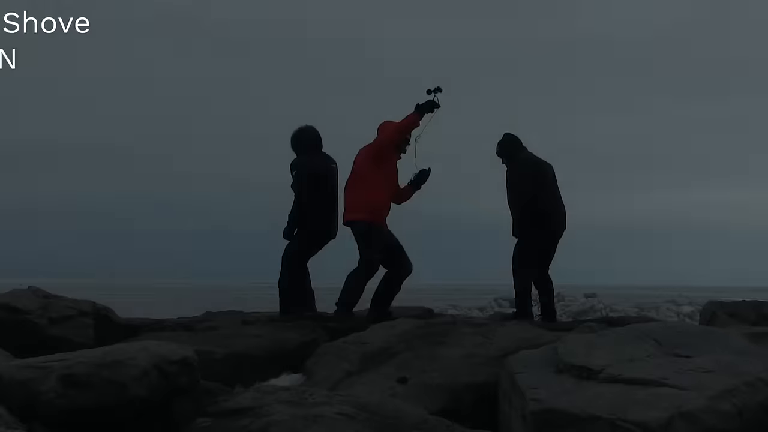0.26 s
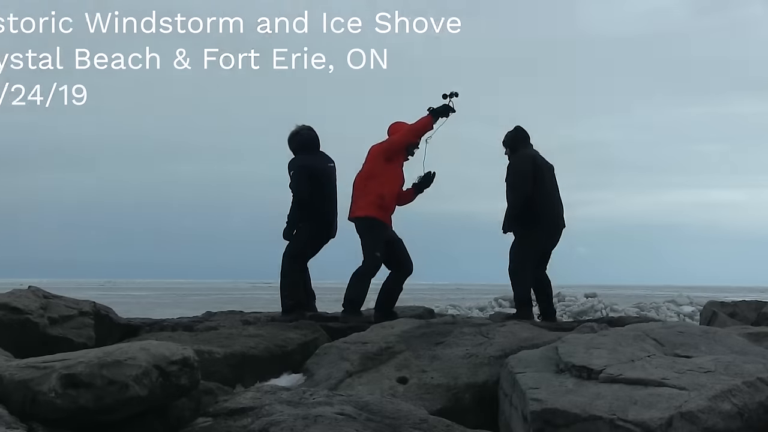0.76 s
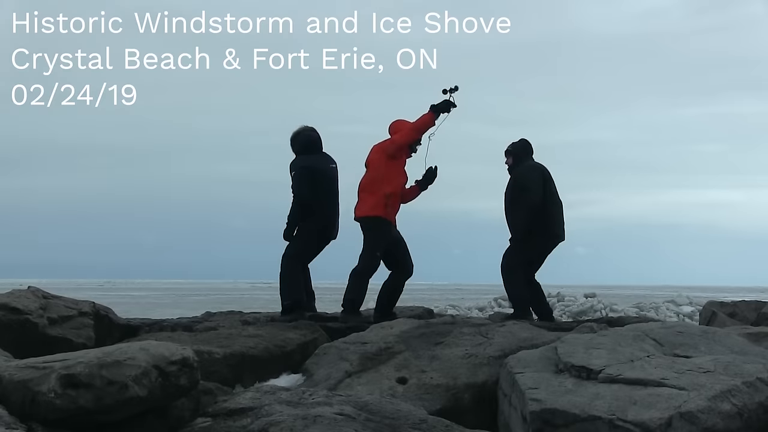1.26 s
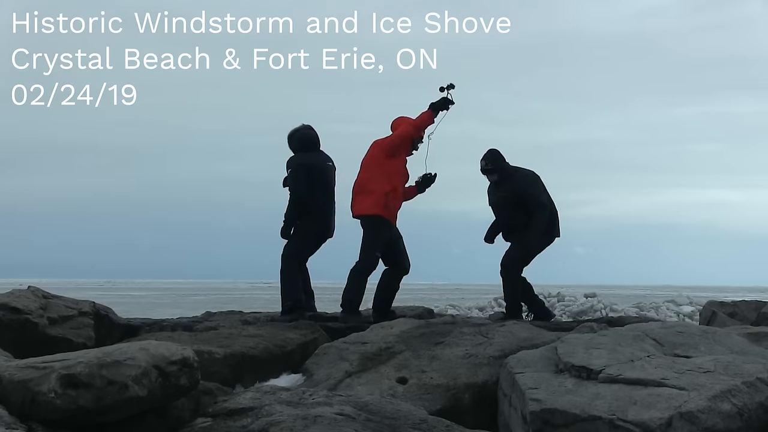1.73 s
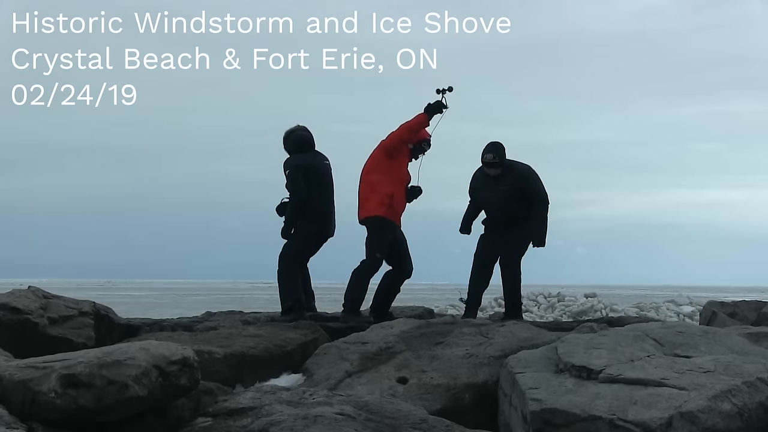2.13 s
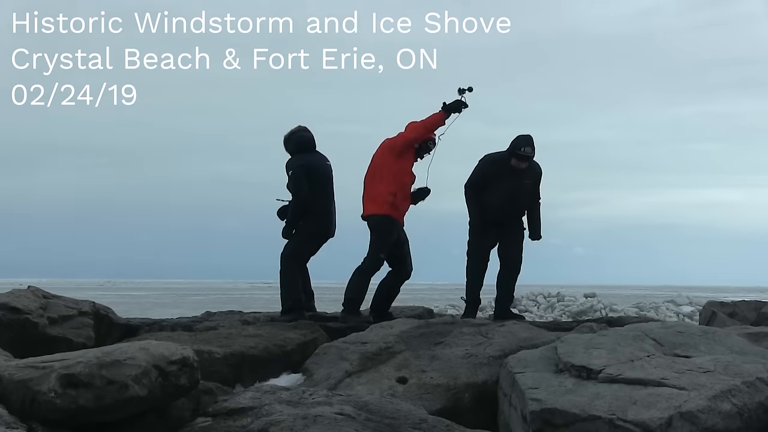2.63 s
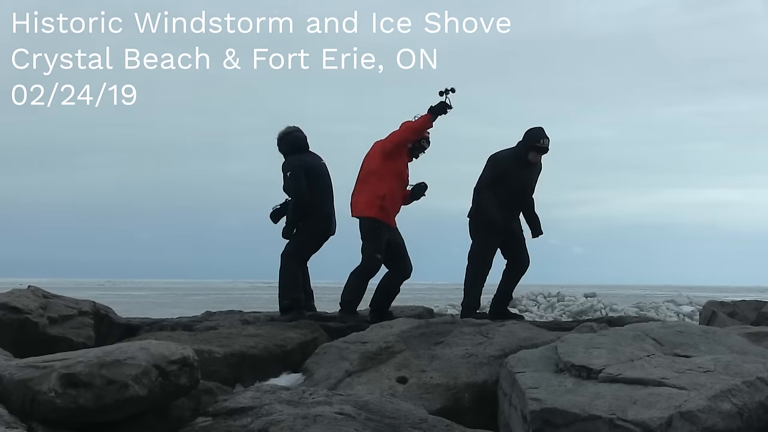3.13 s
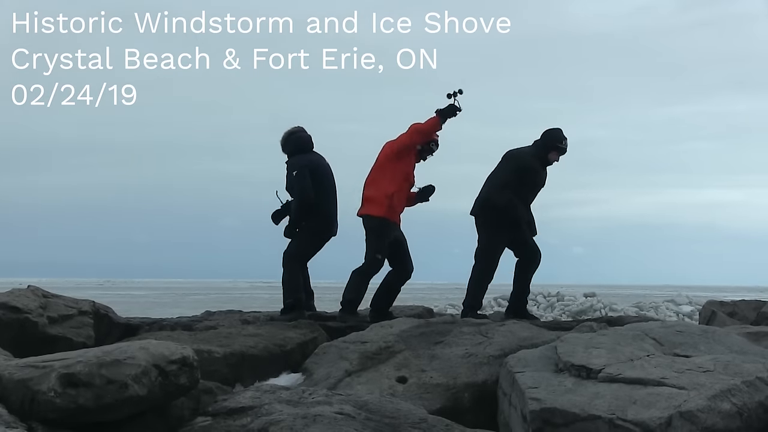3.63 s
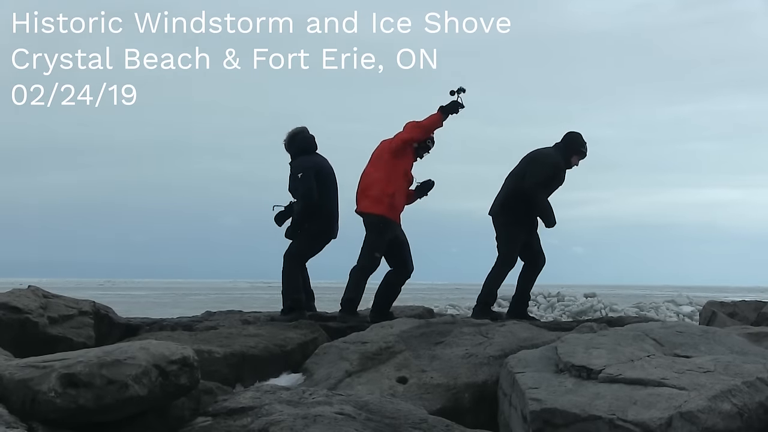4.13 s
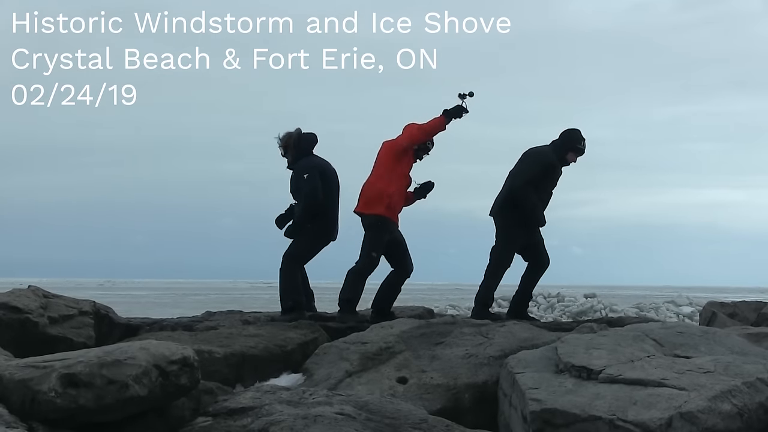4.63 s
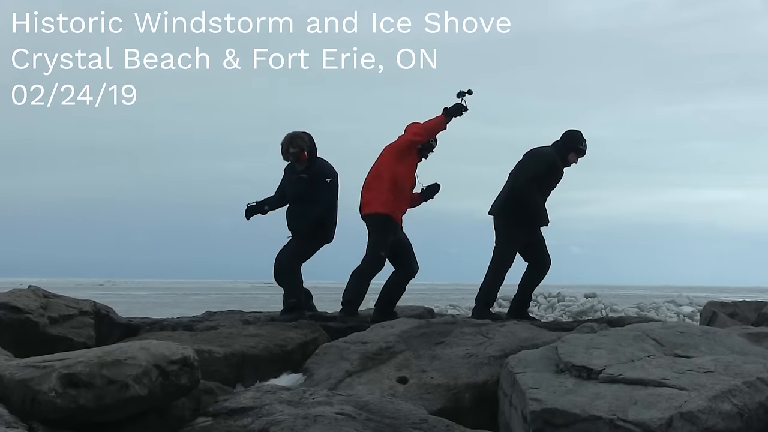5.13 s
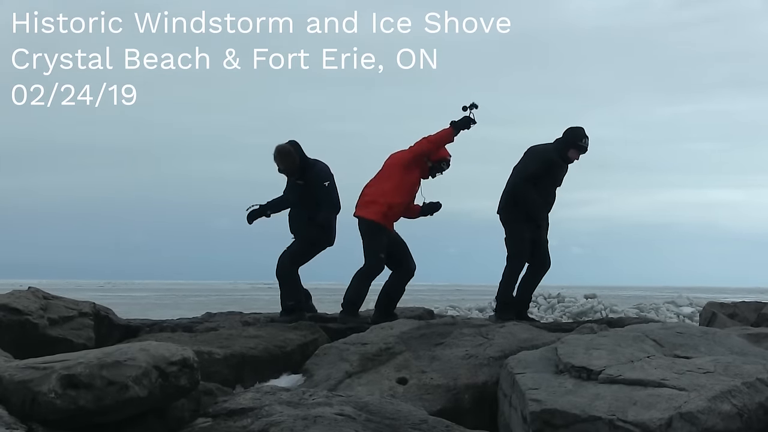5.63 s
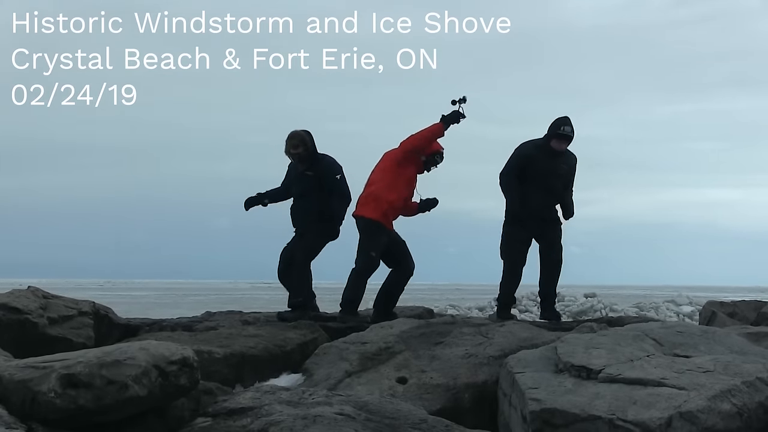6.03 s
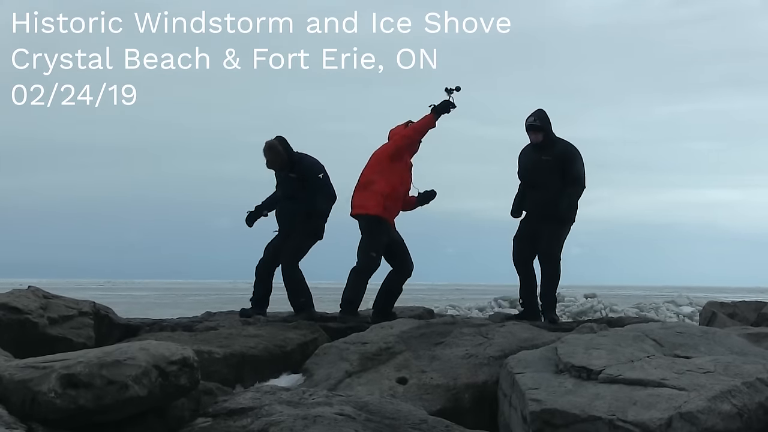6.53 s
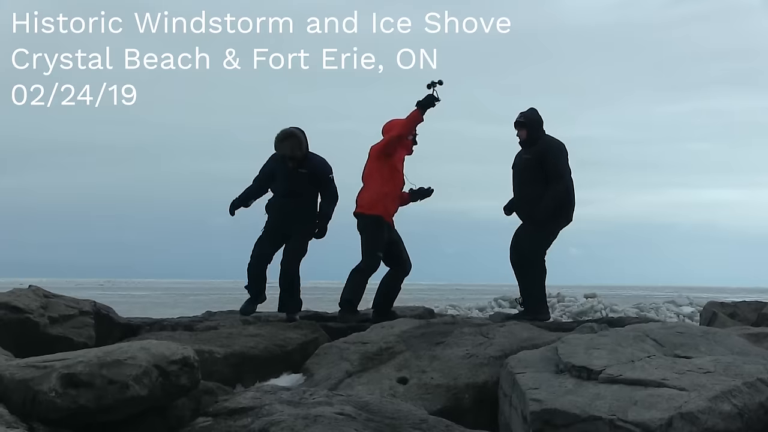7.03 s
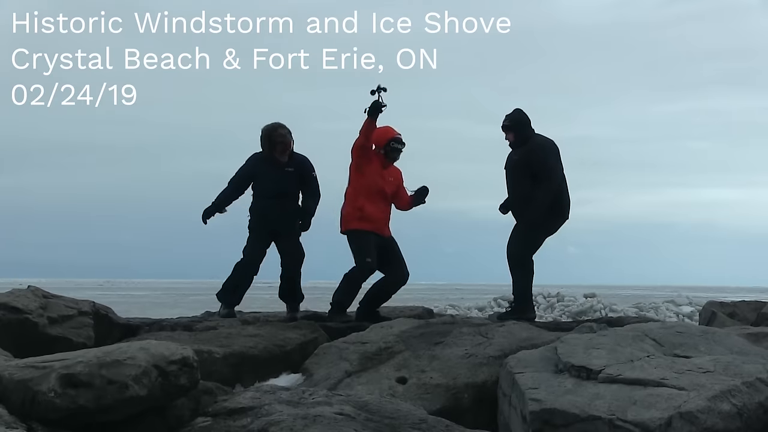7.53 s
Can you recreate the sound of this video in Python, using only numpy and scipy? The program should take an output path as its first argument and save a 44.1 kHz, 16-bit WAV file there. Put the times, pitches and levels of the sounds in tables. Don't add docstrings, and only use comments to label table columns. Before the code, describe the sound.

A continuous low roar of storm wind, very close because it presses directly on the microphone. Gusts swell and dip irregularly, with rumbling bass, a hollow wavering howl that comes and goes, and faint far hiss above. Small crackling spatters and dull knocks interrupt it, the hardest thump in the later part, with the peaks slightly distorted. It continues to the end without resolving.

```python
import sys
import numpy as np
from scipy import signal
from scipy.fft import rfft, irfft, next_fast_len
from scipy.io import wavfile
from scipy.ndimage import uniform_filter1d

SR = 44100
rng = np.random.default_rng(int(sys.argv[2]) if len(sys.argv) > 2 else 0)


def convert_level_to_amplitude(level_db):
    exponent = np.asarray(level_db, float) / 20
    return 10 ** exponent


def unload_audio(sound):
    columns = np.transpose(np.atleast_2d(sound))
    steps = np.round(np.clip(columns, -1, 1) * 32767)
    wavfile.write(sys.argv[1], SR, steps.astype(np.int16))


N = 342657

# start_s, level_db
WIND = [(0.0, -34.5), (0.32, -21.5), (2.44, -19), (2.51, -21), (3.16, -21), (3.63, -18), (3.68, -22),
        (4.37, -21.5), (4.39, -20.5), (5.02, -21), (5.11, -23.5), (6.1, -24), (6.38, -25.5), (6.47, -21.5),
        (6.9, -23), (7.06, -18), (7.75, -24), (7.77, -21)]
# centre_s, peak_db, pitch_hz, spread_s
THUMPS = [
    (5.508, 0, 150, .0052),
    (5.864, -6, 190, .005),
    (4.483, -9, 240, .008),
    (7.085, -8, 170, .008),
    (7.318, -7, 260, .004),
    (7.578, -46, 8300, .006),
]


def rms_one(x):
    return x / np.sqrt(np.mean(x ** 2) + 1e-20)


def in_time(rows):
    time_s, *columns = np.transpose(rows)
    return [np.interp(np.arange(N) / SR, time_s, column) for column in columns]


def at_hz(points, hz):
    table_hz, value = np.array(points).T
    return np.interp(np.log(hz), np.log(table_hz), value)


def about(curve_db, mean_db):
    return curve_db - curve_db.mean() + mean_db


def swing(rows):
    return about(in_time(rows)[0], 0)


def bell(t, centre_s, spread_s):
    return np.exp(-((t - centre_s) / spread_s) ** 2)


def drift(rate_hz):
    pole = np.exp(-80 * np.pi * rate_hz / SR)
    noise = rng.standard_normal(N // 40 + 2002)
    slow = signal.lfilter([1], [1, -2 * pole, pole * pole], noise)[2000:]
    return np.interp(np.arange(N) / 40, np.arange(len(slow)), rms_one(slow))


def struck(rows, sizes_hz, length_s, octaves):
    event_s, lift_db, hz = np.transpose(rows)
    coarse_s = np.arange(0, N + 64, 64) / SR
    passing = bell(coarse_s[:, None], event_s, length_s)
    reach = np.exp(-(np.log2(hz[:, None] / np.array(sizes_hz)) / octaves) ** 2)
    lifts_db = passing @ (lift_db[:, None] * reach)
    return np.array(in_time(np.column_stack([coarse_s, lifts_db])))


def stereo_spectrum(spectrum, size, hz):
    # pitch_hz, width_hz, level_db
    cavity = [(147, 72, 2), (3030, 110, 2.5)]
    # pitch_hz, coherence (0 to 1)
    likeness = [(60, 0.69), (110, 0.97), (200, 0.87), (380, 0.83), (700, 0.72), (1290, 0.79), (2380, 0.2),
                (4400, 0.82), (8120, 0.67), (15000, 0.65)]
    # pitch_hz, level_db
    lean = [(60, -3), (130, -1.5), (290, -2.0), (640, -1.0), (1410, -2), (3100, 1), (6820, -1), (15000, 0)]
    # pitch_hz, phase_rad
    lead = [(300, 0.044), (1290, -0.21), (1980, 1.56), (2670, -0.23), (4310, 0.93), (9000, 0.28)]
    colour_db = at_hz([(1, -150)] + list(spectrum) + [(SR, -150)], hz)
    for mode_hz, width_hz, db in cavity:
        colour_db += db / (1 + (2 * (hz - mode_hz) / width_hz) ** 2)
    alike = np.clip(at_hz([(45, .985)] + likeness, hz), 0, .99)
    mid, side = rfft(rng.standard_normal((2, size)))
    sign = np.array([[1], [-1]])
    pair = np.sqrt(1 + alike) * mid + sign * np.sqrt(1 - alike) * side
    gain = convert_level_to_amplitude(colour_db + sign * at_hz(lean, hz) / 2)
    return pair * gain * np.exp(.5j * sign * at_hz(lead, hz))


def turbulence(spectrum, span_hz, anchors_hz, levels_db, shared_db, own_db, rate_hz, steady, steady_s=0.178):
    size = next_fast_len(N)
    hz = np.maximum(np.arange(size // 2 + 1) * SR / size, 1)
    pair = stereo_spectrum(spectrum, size, hz)
    inside = (hz > span_hz[0]) & (hz < span_hz[1])
    pair /= np.sqrt(2 * np.sum(np.abs(pair.mean(0)[inside]) ** 2)) / size
    centres_hz = np.geomspace(spectrum[0][0], spectrum[-1][0], 8)
    place = np.interp(np.log(hz), np.log(centres_hz), np.arange(len(centres_hz)))
    out, together = 0, drift(rate_hz)
    for k, centre_hz in enumerate(centres_hz):
        band = irfft(pair * np.clip(1 - np.abs(place - k), 0, 1), size)[:, :N]
        swell = uniform_filter1d(band.mean(0) ** 2, size=round(steady_s * SR))
        band = band * ((swell + 1e-20) / swell.mean()) ** (-steady / 2)
        anchor = np.interp(np.log(centre_hz), np.log(anchors_hz), np.arange(len(anchors_hz)))
        level_db = sum(max(0, 1 - abs(anchor - j)) * curve for j, curve in enumerate(levels_db))
        out = out + band * convert_level_to_amplitude(level_db + shared_db * together + own_db * drift(rate_hz))
    return out


def buffeting():
    # pitch_hz, density_db (per Hz)
    eddies = [(13, -43), (22, -22), (43, -4.5), (85, -8.5), (173, 0.5), (239, -2.5), (318, -2),
              (620, -12.5), (764, -11), (841, -15), (1040, -15), (1160, -17.5), (1380, -16), (1640, -24),
              (2100, -33), (2730, -57), (4620, -120)]
    # centre_s, lift_db, size_hz
    buffets = [(.4, 3, 220), (.6, 1, 160), (.9, 3, 160), (1.1, 3.5, 160), (1.2, 1.5, 380), (1.7, 3, 380),
               (1.4, 4, 159), (1.8, 12, 100), (2.1, 1, 160), (2.22, 4.5, 298), (2.5, 3.5, 380),
               (2.8, 5.5, 380), (4.08, 6, 220), (3.5, 8.5, 258), (3.82, 2, 160), (3.92, 7, 300),
               (4.3, 3, 160), (4.4, 2, 380), (4.5, 7.5, 160), (4.75, 5, 161), (4.97, 1.5, 380),
               (5.48, 7.5, 298), (5.7, 2, 160), (6.0, 7, 243), (6.2, 1, 160), (6.5, 1.5, 160),
               (6.68, 7.5, 300), (7.15, 7.5, 225), (7.4, 2, 160), (7.6, 5.5, 160)]
    # centre_s, lift_db, size_hz
    heaves = [(.55, 5, 55), (1.35, 5, 55), (1.78, 6.5, 60), (2.4, 7, 55), (2.78, 7, 60), (3.45, 6.5, 55),
              (3.65, 2, 55), (3.9, 8, 60), (4.2, 6, 60), (4.55, 2, 55), (4.95, 8, 60), (5.5, 9, 60),
              (5.72, 5, 55), (6.0, 4, 55), (6.4, 4.5, 55), (6.7, 8.5, 60), (6.9, 2, 55), (7.15, 3, 60),
              (2.25, 3.5, 250), (3.95, 3.5, 250), (7.17, 2.5, 300), (7.36, 2, 800), (1.9, 2, 900),
              (4.75, 1, 800)]
    wind_shares = [.6, .7, .9, .95]
    sizes_hz, wind_db = [60, 160, 380, 900], swing(WIND)
    lifts_db = struck(buffets, sizes_hz, length_s=0.05, octaves=0.62)
    lifts_db = lifts_db + struck(heaves, sizes_hz, length_s=0.13, octaves=0.62)
    levels_db = [about(share * wind_db + lift_db, -17.5)
                 for share, lift_db in zip(wind_shares, lifts_db)]
    return turbulence(eddies, (110, 240), sizes_hz, levels_db,
                      shared_db=0.52, own_db=0.22, rate_hz=10.0, steady=0.65)


def thumps():
    t = np.arange(N) / SR
    return sum(convert_level_to_amplitude(db) * bell(t, centre_s, spread_s) * np.sin(2 * np.pi * hz * (t - centre_s))
               for centre_s, db, hz, spread_s in THUMPS)


def howl():
    # pitch_hz, width_hz, level_db
    slot_modes = [(1020, 80, -2), (1365, 90, 0), (1480, 130, -2)]
    # start_s, level_db
    facing = [(0, -6.5), (.3, -4), (.6, 3.5), (1.1, 2), (1.27, 2.5), (1.9, 2.5), (2.42, 2), (2.52, -1.5),
              (3.44, 0), (3.63, 1.5), (3.69, -15), (4.16, -22), (4.3, -11), (5.97, -1), (6.15, -11),
              (6.47, 3.5), (7.05, -10), (7.77, -6)]
    out = 0
    for hz, width_hz, db in slot_modes:
        mid, side = rng.standard_normal((2, N))
        b, a = signal.iirpeak(hz, hz / width_hz, fs=SR)
        pair = np.array([mid + 0.51 * side, mid - 0.21 * side])
        ringing = signal.lfilter(b, a, signal.lfilter(b, a, pair))
        out = out + convert_level_to_amplitude(db) * rms_one(ringing)
    level_db = -30.0 + in_time(facing)[0] + 0.32 * swing(WIND)
    return rms_one(out) * convert_level_to_amplitude(level_db) * convert_level_to_amplitude([[-1.1], [1.1]])


def spatter():
    # start_s, peak_db, hold_s, fade_s, centre_hz
    splashes = [(1.766, -25, .014, .002, 6900), (1.7655, -38, .018, .0015, 13000),
                (1.767, -29.5, .011, .003, 3400), (1.78, -36, .005, .018, 6000),
                (1.645, -42, .02, .03, 5000), (4.41, -46, .02, .02, 7000), (4.7, -48, .01, .02, 6000),
                (5.02, -48, .01, .02, 8000), (5.38, -40, .015, .015, 2600), (5.443, -46, .01, .025, 8000),
                (5.716, -56, .006, .006, 12000), (5.858, -52, .016, .008, 10000),
                (5.864, -41, .008, .01, 5800), (5.864, -31, .014, .012, 2600),
                (5.862, -17.5, .014, .01, 1000), (4.405, -38, .025, .015, 2800),
                (4.71, -41, .02, .015, 3200), (5.939, -43, .004, .004, 9800),
                (6.466, -24, .016, .025, 1150), (6.467, -36, .016, .02, 3000), (3.84, -24, .006, .01, 900),
                (4.274, -24, .006, .01, 900), (7.195, -43, .006, .012, 7000),
                (4.213, -48, .004, .005, 8000)]
    out = np.zeros((2, N))
    t = np.arange(int(.15 * SR)) / SR
    for start_s, db, hold_s, fade_s, hz in splashes:
        mid, side = rng.standard_normal((2, len(t)))
        pair = np.array([mid + 0.54 * side, mid - 0.5 * side])
        edges_hz = [hz * .65, min(hz * 1.35, .45 * SR)]
        pair = signal.sosfilt(signal.butter(2, edges_hz, "band", fs=SR, output="sos"), pair)
        attack = np.minimum(t / 0.00091, 1)
        decay = np.exp(-np.maximum(t - hold_s, 0) / fade_s)
        first = int(start_s * SR)
        out[:, first:first + len(t)] += convert_level_to_amplitude(db) * rms_one(pair) * attack * decay
    return out


def surf():
    # pitch_hz, density_db (per Hz)
    hiss = [(1120, -33), (1900, -0.5), (2350, -5.5), (3190, -5), (4250, -11), (4740, -16), (5610, -15),
            (6630, -17.5), (7230, -20.5), (10400, -25), (14100, -35), (15600, -38)]
    # start_s, level_db
    airborne = [(0.0, -57), (0.15, -54), (0.48, -44), (0.73, -44.5), (1.58, -47.5), (1.84, -43.5),
                (2.53, -49.5), (3.53, -46), (3.68, -48.5), (4.07, -51.5), (4.85, -48.5), (5.19, -51.5),
                (6.43, -50), (6.6, -44.5), (6.97, -48), (7.25, -43.5), (7.66, -50), (7.77, -50)]
    # centre_s, lift_db, pitch_hz
    puffs = [(.9, 3.5, 7000), (1.1, 3, 3000), (1.66, 4, 3000), (1.92, 3, 6000), (2.3, 2.5, 3000),
             (2.76, 1.5, 5000), (3.3, 0, 6000), (3.5, 2.5, 3000), (3.9, 0.5, 6000), (4.38, 2, 6000),
             (4.56, 1, 4000), (4.8, 1, 3000), (5.2, 0.5, 7000), (5.42, 3.5, 3000), (6.0, 5, 6000),
             (6.48, 5, 8000), (7.18, 3, 5000), (7.42, 1, 4000)]
    hiss_shares = [(0.78, 0.27), (0.22, 0.74), (.05, 1)]
    sizes_hz, wind_db, spray_db = [3000, 6400, 11500], swing(WIND), swing(airborne)
    lifts_db = struck(puffs, sizes_hz, length_s=0.056, octaves=1.1)
    levels_db = [about(wind_share * wind_db + spray_share * spray_db + lift_db, -39.)
                 for (wind_share, spray_share), lift_db in zip(hiss_shares, lifts_db)]
    return turbulence(hiss, (2000, 4500), sizes_hz, levels_db,
                      shared_db=0.4, own_db=0.27, rate_hz=23.0, steady=0.33)


def scene():
    t = np.arange(N) / SR
    swept = 1 - .7 * sum(bell(t, centre_s, spread_s) for centre_s, _, _, spread_s in THUMPS[:2])
    return buffeting() * swept + thumps() + howl() + spatter() + surf()


def top_cut(x):
    return signal.sosfilt(signal.butter(12, 15700, fs=SR, output="sos"), x)


def record(dry):
    dry = signal.sosfilt(signal.butter(2, 30., "high", fs=SR, output="sos"), dry)
    soft = dry / (1 + np.abs(dry / 1.02) ** 8) ** (1 / 8)
    return top_cut(soft)


dry = scene()
out = record(dry)
unload_audio(out)
```